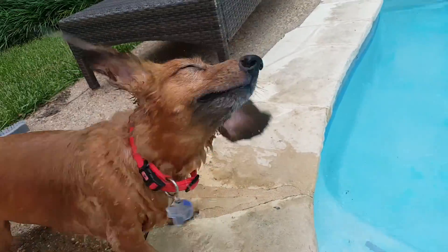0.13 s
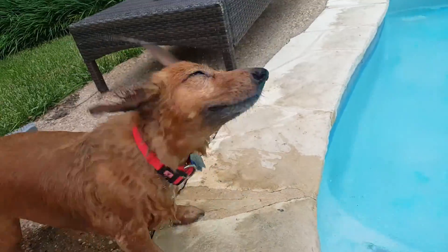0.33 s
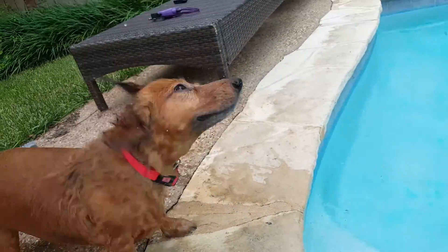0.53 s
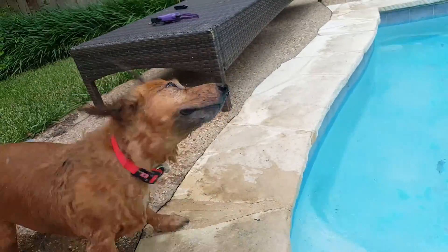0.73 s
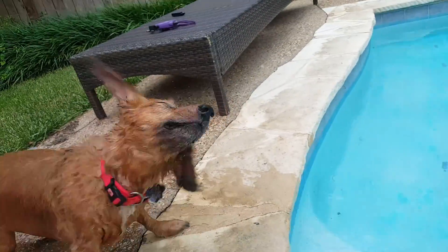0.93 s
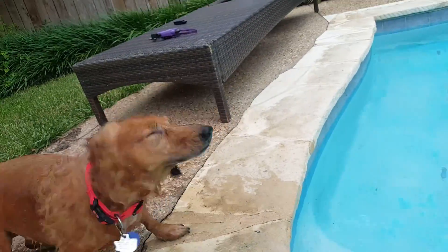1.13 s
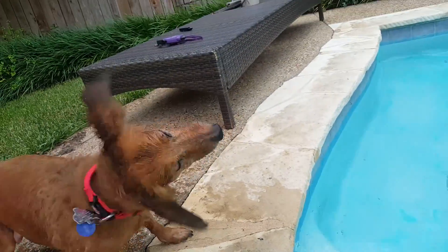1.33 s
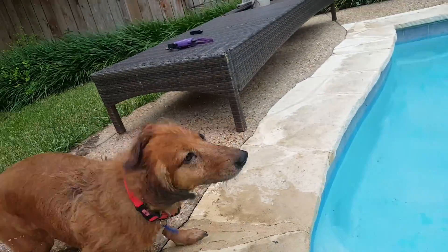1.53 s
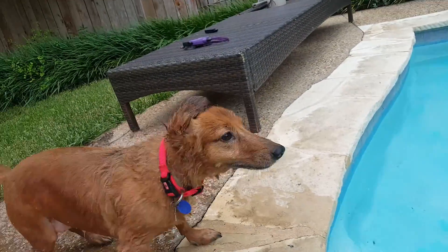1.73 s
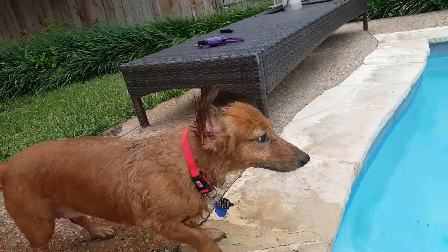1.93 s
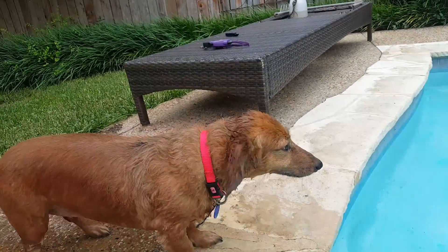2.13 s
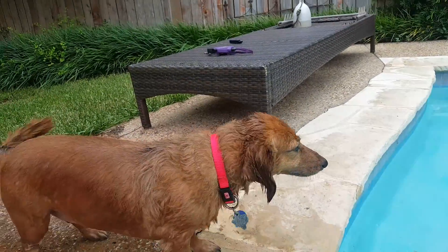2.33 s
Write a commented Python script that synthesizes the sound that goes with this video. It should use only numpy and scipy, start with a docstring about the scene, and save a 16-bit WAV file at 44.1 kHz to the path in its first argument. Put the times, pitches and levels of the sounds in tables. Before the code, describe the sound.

A wet dog shakes itself close by, left of centre, outdoors. From 0 to 1.75 seconds, ragged ear slaps come about ten or more a second, with droplet spray, buckle knocks and jingling metal tags, sharpest around 0.6, 0.8 and 1.65. Faint tinkles follow until 2.0, then a soft rustle and a wind gust near 2.1. Low wind rumble, soft air and thin, high insect buzz continue to about 2.5.

```python
"""Outdoors, left of a handheld camera, a wet dog shakes itself: noise-puff ear slaps with low thumps,
two metal tags that clink as noise and ring as decaying modes, rough two-mode buckle knocks,
droplet spray of lumpy bright noise, then a soft high rustle. Wind rumbles and buffets both
microphone ports over soft air noise; insects buzz as pulsing treble noise."""
import sys
import numpy as np
from scipy import signal
from scipy.fft import rfft, irfft, next_fast_len
from scipy.io import wavfile
from scipy.ndimage import map_coordinates

SR = 44100
rng = np.random.default_rng(int(sys.argv[2]) if len(sys.argv) > 2 else 0)


def inscribe(sig):
    """Save sig as 16-bit PCM at rate SR to the path in sys.argv[1].

    A 1-D sig is mono; a 2-D sig holds one channel per row.
    Samples are clipped to [-1, 1] before scaling.
    """
    pcm = np.round(np.clip(np.atleast_2d(sig).T, -1, 1) * 32767)
    wavfile.write(sys.argv[1], SR, pcm.astype(np.int16))


def volts_from_decibels(level):
    """Turn decibel levels (scalar or array-like) into linear amplitude factors."""
    exponent = np.asarray(level, float) / 20
    return 10 ** exponent


N = 108794

# droplet spray spectrum: freq_hz, relative_density_db
SPRAY_SPECTRUM = [(1500, 0), (3000, 1.5), (5500, 1.5), (9000, -7), (12000, -18.5), (16000, 1.5)]
# vigour of the shake, drives small rattle and mist: time_s, vigour_db
VIGOUR = [(0, -50), (.08, -64.5), (.12, -39.5), (.2, -49), (.3, -50), (.52, -48), (.58, -41.5),
          (.73, -47.5), (.8, -38), (.87, -49.5), (1.0, -41.5), (1.2, -45), (1.31, -47), (1.42, -40),
          (1.7, -44), (1.76, -48.5), (1.97, -57.5), (2.15, -69), (2.47, -95)]


def unit(x):
    """Scale to rms 1."""
    return x / np.sqrt(np.mean(x ** 2) + 1e-20)


def along(points, hz):
    """Interpolate (Hz, value) points on a log frequency axis."""
    f, v = np.transpose(points)
    return np.interp(np.log(hz + 1), np.log(f + 1), v)


def curves(rows):
    """One value per sample for each column after the time."""
    s, *cols = np.transpose(rows)
    return [np.interp(np.arange(N) / SR, s, c) for c in cols]


def wobble(rate_hz):
    """Smooth random curve, rate_hz knots a second."""
    knots = rng.standard_normal(int(N * rate_hz / SR) + 4)
    return map_coordinates(knots, [np.arange(N) * rate_hz / SR])


def filtered(x, response):
    """Apply a complex response of frequency."""
    size = next_fast_len(N + 8192)
    spectrum = rfft(x, size) * response(np.fft.rfftfreq(size, 1 / SR))
    return irfft(spectrum, size)[..., :N]


def noise(spectrum, channels=1):
    """Coloured Gaussian noise of rms 1."""
    closed = [(1, -120)] + list(spectrum)
    white = rng.standard_normal((channels, N))
    return unit(filtered(white, lambda hz: volts_from_decibels(along(closed, hz))))


def add(track, s, sound):
    """Mix a sound into a track from time s."""
    part = track[..., max(round(s * SR), 0):][..., :sound.shape[-1]]
    part += sound[..., :part.shape[-1]]


def burst(t, rise_s, t60_s):
    """Envelope with a soft rise and exponential decay, top at 1."""
    shape = (1 - np.exp(-t / rise_s)) ** 2 * volts_from_decibels(-60 * t / t60_s)
    return shape / shape.max()


def puff(colour, s, shape):
    """Piece of coloured noise under an envelope, peak at 1."""
    piece = np.roll(colour, -round(s * SR))[:len(shape)] * shape
    return piece / np.abs(piece).max()


def stereo_gain(db, pan_db):
    """Left and right gains, pan_db apart."""
    return volts_from_decibels(db + pan_db * np.array([[0.5], [-0.5]]))


def wind():
    """Turbulence: two lumpy rumble layers, independent at each port, plus single low buffets."""
    # rumble levels: time_s, deep_db, upper_db
    wind_levels = [(0, -34, -30.5), (.15, -40, -37), (.27, -42.5, -45.5), (.5, -39, -42),
                   (.63, -40.5, -35.5), (.72, -42, -43), (.97, -40, -45.5), (1.05, -47, -50.5),
                   (1.4, -42, -45), (1.7, -38.5, -43.5), (1.83, -39, -46.5), (1.97, -38, -41),
                   (2.08, -31, -30), (2.24, -42, -32), (2.36, -37, -37), (2.47, -41, -47)]
    # layer spectra: freq_hz, relative_density_db
    deep_spectrum = [(20, -41), (40, -17.5), (70, -3.5), (120, -1), (200, -8.5), (400, -33.5), (1500, -120)]
    upper_spectrum = [(60, -29), (130, -2.5), (200, -1.5), (400, -10.5), (700, -28.5), (1200, -95),
                      (3000, -120)]
    # single buffets: start_s, level_db, pitch_hz, left_minus_right_db
    buffets = [(0.601, -18, 202, 0), (0.619, -20, 163, -1), (1.452, -26, 102, 7.5), (1.683, -25.5, 191, 2),
               (2.062, -25, 143, -16)]
    lumps_db, lumps_hz, buffet_cycles = 3.5, 30, 2.25
    lumps = volts_from_decibels(lumps_db * np.array([wobble(lumps_hz), wobble(lumps_hz)]))
    out = np.zeros((2, N))
    for db, spectrum in zip(curves(wind_levels), (deep_spectrum, upper_spectrum)):
        out += volts_from_decibels(db) * unit(lumps * noise(spectrum, channels=2))
    signs = np.sign(rng.standard_normal((len(buffets), 2, 1)))  # random polarity at each port
    for (s, db, hz, pan_db), sign in zip(buffets, signs):
        t = np.arange(round(buffet_cycles * SR / hz)) / SR
        push = np.hanning(len(t)) * np.sin(2 * np.pi * hz * (t - t.mean()))
        add(out, s, sign * stereo_gain(db, pan_db) * push)
    return out


def insects():
    """Treble noise whose level pulses at a drifting rate."""
    # insect spectrum: freq_hz, relative_density_db
    insect_spectrum = [(11000, -25), (13000, -7.5), (14500, 5.5), (15600, 7.5), (17000, -26)]
    level_db, pulse_hz, pulse_db, drift = -46.5, 35.4, 2, 0.079
    phase = 2 * np.pi * np.cumsum(pulse_hz * (1 + drift * wobble(13))) / SR
    buzz_db = level_db + pulse_db * np.sin(phase) + 0.44 * wobble(5.4)
    return volts_from_decibels(buzz_db) * noise(insect_spectrum, channels=2)


def air():
    """Soft broadband noise with a slight level drift."""
    # air spectrum: freq_hz, relative_density_db
    air_spectrum = [(300, 9.5), (700, 10), (1500, 0), (3000, -3), (7000, -10.5), (10000, -15.5),
                    (12000, -10), (16000, -14)]
    return volts_from_decibels(-52.5 + 0.26 * wobble(7.33)) * noise(air_spectrum, channels=2)


def mist():
    """Droplets fly off the coat in lumps: bright noise that follows the vigour."""
    vigour_db, = curves(VIGOUR)
    level_db, lumps_db, lumps_hz = -2, 3.5, 120
    return volts_from_decibels(vigour_db + level_db + lumps_db * wobble(lumps_hz)) * noise(SPRAY_SPECTRUM)[0]


def rattle():
    """Random small contacts: times, and three levels each that follow the vigour."""
    count, spread_db = 250, 0.5
    vigour_db, = curves(VIGOUR)
    chance = rng.random((count, 4))
    at = (chance[:, 0] * (N - 1)).astype(int)
    return at / SR, vigour_db[at, None] + spread_db * np.log(chance[:, 1:] + 1e-3)


def ears():
    """Each slap is a ragged puff of dull body and bright spray, on the near or far side of the head."""
    # slaps: time_s, level_db, pan_db, treble_db
    slaps = [(0.086, -22.5, -1.5, -2), (0.212, -24, 0.5, -1.5), (0.241, -29.5, -4, 3.5),
             (0.326, -23, 0.5, 0.5), (0.44, -26, 4.5, -6.5), (0.461, -29.5, -3, -1), (0.548, -24, 0.5, -8),
             (0.689, -29.5, 1.5, 2.5), (0.748, -29.5, 9, -2), (0.775, -33, -8.5, 12.5),
             (0.845, -23, 1.5, -10.5), (0.885, -34, -13.5, 7.5), (0.932, -22.5, 2.5, -8.5),
             (0.965, -33.5, -3.5, 12), (1.023, -29, 10.5, 0.5), (1.057, -28, -10, 2),
             (1.107, -23, 1.5, -0.5), (1.143, -32.5, -5, 6.5), (1.19, -28, 6, -25), (1.245, -33, -11.5, -5),
             (1.275, -27.5, -11, 3.5), (1.33, -39, -8, 9.5), (1.376, -31, 0.5, -3), (1.436, -27, 15, -21),
             (1.515, -23.5, 11.5, -2), (1.538, -26, -1, -11), (1.597, -20, -1, -3), (1.678, -24, -14, 3),
             (1.716, -28.5, 13.5, -25), (1.728, -33.5, -17, -14)]
    # dull body spectrum: freq_hz, relative_density_db
    body_spectrum = [(150, 11.5), (400, 4), (1000, 2.5), (2200, 3.5), (4500, -6), (16000, -29)]
    rise_s, t60_s, body_db, spray_db = 0.003, 0.018, 1.5, 6.5
    body, spray = np.zeros((2, N)), np.zeros((2, N))
    ragged = volts_from_decibels(3.7 * wobble(800))
    shape = burst(np.arange(SR // 20) / SR, rise_s, t60_s)
    dull = ragged * noise(body_spectrum)[0]
    bright = ragged * noise(SPRAY_SPECTRUM)[0]
    for s, db, pan_db, treble_db in slaps:
        gain = stereo_gain(db, pan_db)
        start_s = s - rise_s / 2
        add(body, start_s, gain * volts_from_decibels(body_db) * puff(dull, s, shape))
        add(spray, start_s, gain * volts_from_decibels(treble_db + spray_db) * puff(bright, s, shape))
    return body, spray


def tag_ring(mode_hz, modes, t, free_s, chance):
    """Decaying complex modes, one row each, damped after free_s."""
    scatter_db, detune, rise_s, damp_s = 3, 0.0023, 0.0012, 0.0085
    db, t60_s, _ = np.transpose(modes)[..., None]
    hz = np.array(mode_hz)[:, None] * (1 + detune * chance[:, 1:])
    decay = volts_from_decibels(db + scatter_db * chance[:, :1] - 60 * t / t60_s)
    damping = np.exp(-np.maximum(t - free_s, 0) / damp_s)
    return decay * np.exp(2j * np.pi * hz * t) * (1 - np.exp(-t / rise_s)) * damping


def tags():
    """Loud clinks and a small rattle: noise clicks plus modes that flicker as the tags twirl."""
    # clinks: start_s, click_db, low_tag_db, high_tag_db
    clinks = [(0.0878, -24, -60, -60), (0.0927, -20, -36, -48), (0.1154, -23, -31.5, -53),
              (0.1381, -20.5, -35.5, -40), (0.1815, -32, -41, -43), (0.375, -29.5, -51, -53),
              (0.4490, -30.5, -55, -60), (0.5788, -13.5, -44, -58), (0.5898, -16, -26.5, -44),
              (0.603, -22.5, -41.5, -28), (0.6934, -21.5, -40, -43), (0.795, -10, -44, -42),
              (0.804, -24, -47, -28.5), (0.8185, -24.5, -64, -32), (0.9244, -25, -64, -57),
              (0.977, -19.5, -50, -56), (0.991, -18, -33, -35), (1.0333, -21.5, -41, -56),
              (1.0562, -27, -26, -27), (1.069, -15.5, -48, -55), (1.154, -44, -69, -41),
              (1.169, -25, -34, -25.5), (1.19, -15, -28.5, -61), (1.245, -16, -32.5, -43),
              (1.3425, -16, -47, -62), (1.3975, -32, -30, -30.5), (1.4143, -30, -26, -37),
              (1.4334, -20.5, -41, -24.5), (1.4984, -16.5, -17, -41), (1.511, -37, -24.5, -55),
              (1.5395, -19, -21, -30), (1.5547, -24, -25, -30), (1.577, -20, -32, -49),
              (1.633, -25.5, -43.5, -60), (1.655, -13, -37, -52), (1.6593, -10, -27, -51),
              (1.668, -8, -32, -23), (1.7167, -14, -54, -55), (1.731, -13.5, -35.5, -44),
              (1.8113, -46, -43, -47), (1.8518, -37, -36, -42.5), (1.8800, -60, -40, -62),
              (1.9087, -36, -43.5, -48), (1.9380, -54, -40.5, -56), (1.9677, -33, -47, -70),
              (2.003, -53, -49, -53), (2.238, -52, -54, -56.5), (2.4405, -32.5, -56, -79)]
    # mode pitches, low tag then high tag: pitch_hz
    mode_hz = [4114, 6821, 7690, 9660, 11330, 13630]
    # modes of each tag: relative_db, undamped_t60_s, phase_roughness_rad
    low_modes = [(-15.5, 0.24, .35), (-4, 0.37, .4)]
    high_modes = [(5, 0.055, 0.89), (-21, 0.19, .7), (1, 0.074, 1.2), (-1, 0.047, 1.1)]
    # click spectrum: freq_hz, relative_density_db
    click_spectrum = [(1500, -14.5), (3100, -8), (5000, -6.5), (7700, 5.5), (10000, -17), (13000, -2),
                      (16000, -12)]
    click_rise_s, click_t60_s, click_trim_db, ring_trim_db = 0.00061, 0.011, 0.5, -0.5
    longest_free_s, rattle_free_s = 0.024, 0.005
    twirl_db, twirl_hz, rough_hz = 4, 140, 320

    # a loud ring is damped at the next clink, or after longest_free_s
    gaps_s = np.diff([row[0] for row in clinks], append=N / SR + 1)
    loud = np.column_stack([clinks, np.minimum(gaps_s, longest_free_s)])
    at_s, levels_db = rattle()
    small = np.column_stack([at_s, levels_db + [11.5, -4, -4], np.full(len(at_s), rattle_free_s)])
    hits = np.vstack([loud, small])

    all_modes = low_modes + high_modes
    rings, clicks = np.zeros((len(mode_hz), N), complex), np.zeros(N)
    t = np.arange(SR // 16) / SR
    colour = noise(click_spectrum)[0]
    click_shape = burst(t, click_rise_s, click_t60_s)
    chances = rng.standard_normal((len(hits), len(mode_hz), 2))
    for (s, db, low_db, high_db, free_s), chance in zip(hits, chances):
        strike_db = np.repeat([low_db, high_db], [len(low_modes), len(high_modes)])[:, None]
        add(rings, s, volts_from_decibels(strike_db + ring_trim_db) * tag_ring(mode_hz, all_modes, t, free_s, chance))
        add(clicks, s, volts_from_decibels(db + click_trim_db) * puff(colour, s, click_shape))
    twirl = volts_from_decibels(twirl_db * np.array([wobble(twirl_hz) for _ in mode_hz]))
    rough = np.exp([1j * rad * wobble(rough_hz) for _, _, rad in all_modes])
    return (rings * twirl * rough).imag.sum(axis=0) + clicks


def buckle():
    """Short rough knocks, a mode and a weaker neighbour each, and many small ones between."""
    # knocks: time_s, level_db, pitch_hz
    knocks = [(0.0948, -22, 2405), (0.1045, -22, 3260), (0.1143, -25, 4000), (0.1381, -30.5, 3290),
              (0.226, -30.5, 3190), (0.339, -19.5, 3300), (0.5702, -24.5, 2910), (0.5929, -24.5, 3010),
              (0.7748, -22.5, 2930), (0.7814, -31, 2570), (0.7935, -20.5, 3100), (0.9233, -31.5, 3260),
              (0.9535, -27, 3050), (0.9656, -22.5, 2930), (0.9906, -27, 3100), (1.0715, -24, 3410),
              (1.2446, -30.5, 3240), (1.3309, -27, 3220), (1.3967, -31.5, 3260), (1.4324, -25, 2720),
              (1.4957, -20, 4115), (1.5389, -25.5, 3250), (1.6554, -29, 3140), (1.8482, -35, 3180)]
    small_hz, small_scatter, small_db = 3133, 0.148, 3.5
    rise_s, t60_s, trim_db, rough_rad = 0.000982, 0.024, -4, 0.58
    at_s, levels_db = rattle()
    pitches_hz = small_hz * np.exp(small_scatter * rng.standard_normal(len(at_s)))
    hits = np.vstack([knocks, np.column_stack([at_s, levels_db[:, 0] + small_db, pitches_hz])])
    out, t = np.zeros(N, complex), np.arange(SR // 40) / SR
    shape = burst(t, rise_s, t60_s)
    for (s, db, hz), chance in zip(hits, rng.standard_normal((len(hits), 2))):
        neighbour_hz = hz * (1.22 + 0.072 * chance[0])
        main = np.exp(2j * np.pi * hz * t)
        neighbour = 0.45 * np.exp(2j * np.pi * (neighbour_hz * t + chance[1]))
        add(out, s - rise_s, volts_from_decibels(db + trim_db) * shape * (main + neighbour))
    return (out * volts_from_decibels(3.6 * wobble(900)) * np.exp(1j * rough_rad * wobble(1200))).imag


def thumps():
    """A heavy ear on the head: a few low cycles under some of the later slaps, mostly dull ones."""
    # thumps: start_s, level_db
    thump_hits = [(1.023, -32.5), (1.106, -31.5), (1.19, -32), (1.437, -32), (1.515, -28), (1.596, -29)]
    centre_hz, cycles, scatter = 398, 3.45, 0.1
    out = np.zeros(N)
    for (s, db), chance in zip(thump_hits, rng.standard_normal((len(thump_hits), 2))):
        hz = centre_hz * (1 + scatter * chance[0])
        t = np.arange(round(cycles * SR / hz)) / SR
        add(out, s, volts_from_decibels(db) * np.hanning(len(t)) * np.sin(2 * np.pi * hz * t + chance[1]))
    return out


def rustle():
    """Soft high noise under a Gaussian swell after the shake."""
    # rustle spectrum: freq_hz, relative_density_db
    rustle_spectrum = [(6000, -32), (6900, -3), (8200, -1), (9300, -22), (16000, -80)]
    centre_s, spread_s, level_db = 2.07, 0.033, -52.5
    swell = np.exp(-0.5 * ((np.arange(N) / SR - centre_s) / spread_s) ** 2)
    return volts_from_decibels(level_db + 2.4 * wobble(140)) * swell * noise(rustle_spectrum, channels=2)


def shaded(x):
    """The camera body shades the right port, by frequency."""
    # shading: freq_hz, left_over_right_db
    shading = [(300, 12), (1600, 18.5), (3400, 15), (5000, -4.5), (7200, 16), (9500, 14.5), (11300, 7),
               (15000, 0.5)]

    def response(hz):
        right = volts_from_decibels(-along(shading, hz))
        return 2 / (1 + right) * np.array([np.ones_like(hz), right])
    return filtered(x, response)


def lagged(x):
    """Sound reaches the right port later: a linear phase shift."""
    lag_s = np.array([[0], [0.0002]])
    return filtered(x, lambda hz: np.exp(-2j * np.pi * hz * lag_s))


def paving(x):
    """Short scattered answer of the ground: two random tails crossfade slowly at random."""
    t60_s, t = 0.0059, np.arange(SR // 40) / SR
    tails = rng.standard_normal((2, len(t))) * volts_from_decibels(-60 * t / t60_s)
    tails /= np.linalg.norm(tails[0])
    a, b = signal.fftconvolve(x[None], tails, axes=1)[:, :N]
    turn = 2 * wobble(12)
    return a * np.cos(turn) + b * np.sin(turn)


def scene():
    """The dog, shaded, late and partly scattered at the right port, amid wind, insects and air."""
    body, spray = ears()
    bright = shaded(spray + mist() + buckle() + tags())
    left, right = lagged(bright + body + thumps())
    share = 0.76  # power share of the right port's sound that arrives off the paving
    right = np.sqrt(1 - share) * right + np.sqrt(share) * paving(right)
    return np.array([left, right]) + wind() + insects() + air() + rustle()


def low_pass(x):
    """Removes everything above the highest recorded frequency."""
    return signal.sosfilt(signal.butter(12, 17010, fs=SR, output="sos"), x)


def record(dry):
    """The finished mix, as stored."""
    return low_pass(dry)


dry = scene()
out = record(dry)
inscribe(out)
```